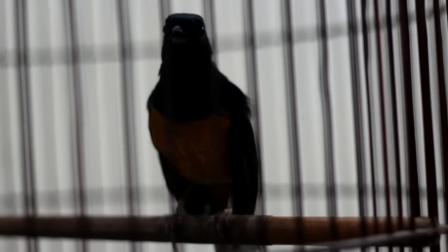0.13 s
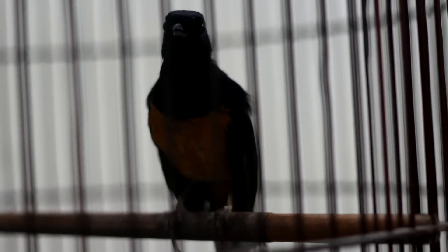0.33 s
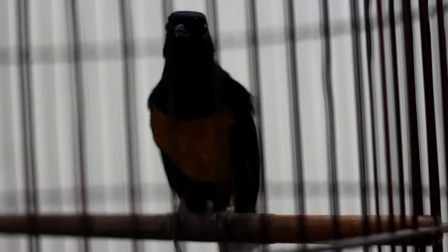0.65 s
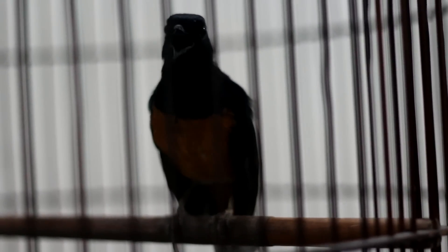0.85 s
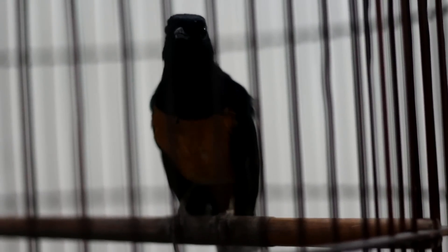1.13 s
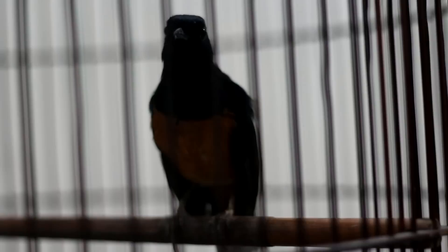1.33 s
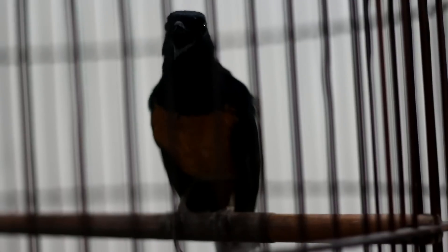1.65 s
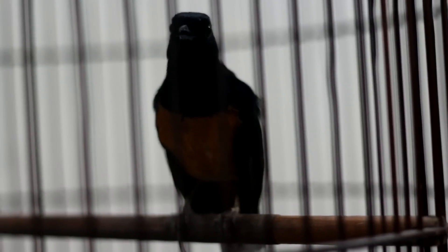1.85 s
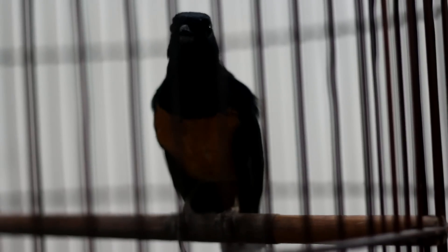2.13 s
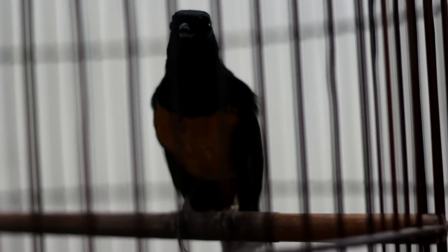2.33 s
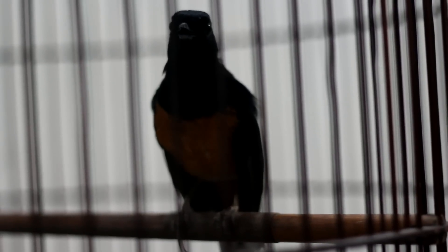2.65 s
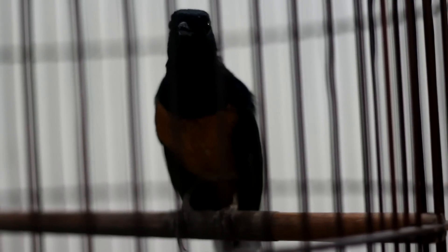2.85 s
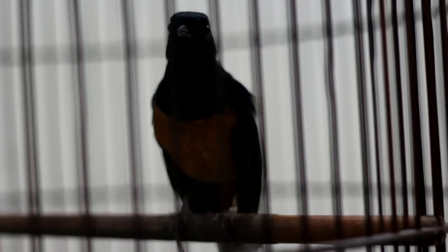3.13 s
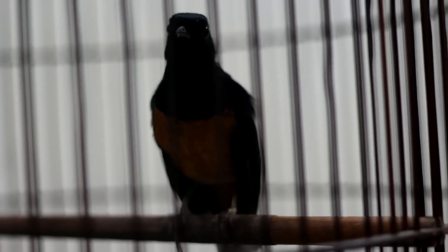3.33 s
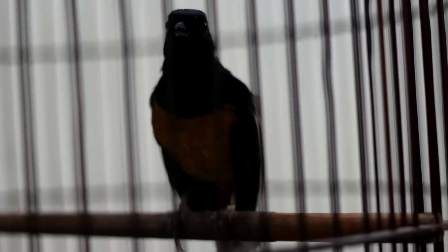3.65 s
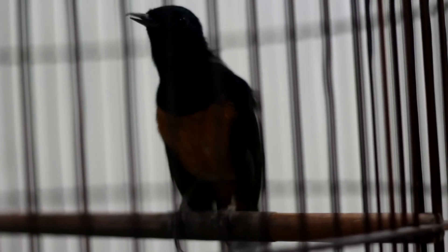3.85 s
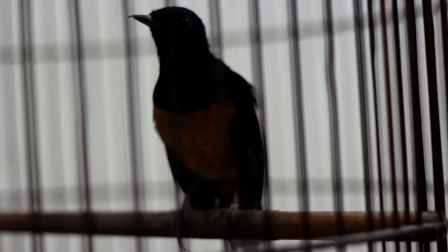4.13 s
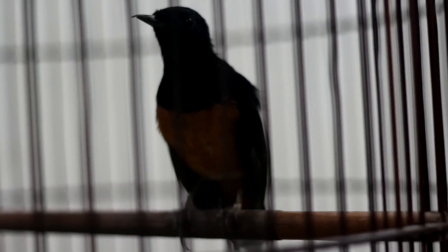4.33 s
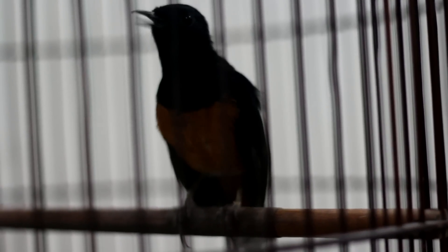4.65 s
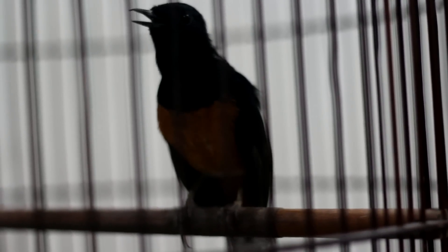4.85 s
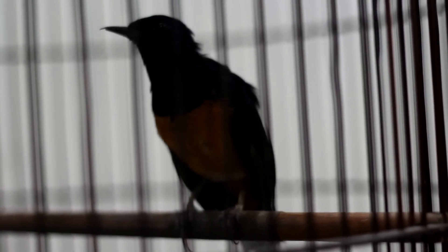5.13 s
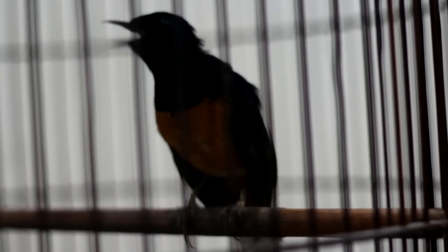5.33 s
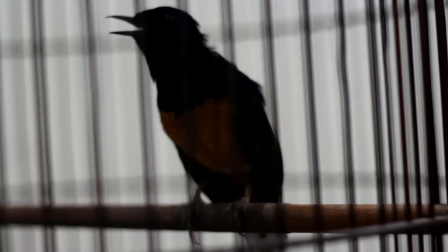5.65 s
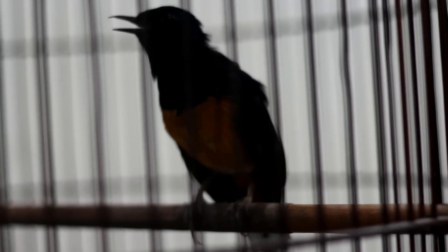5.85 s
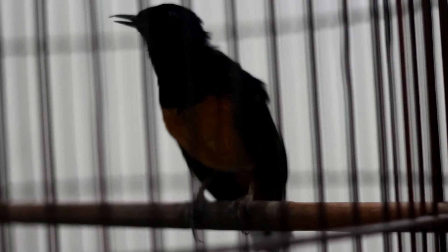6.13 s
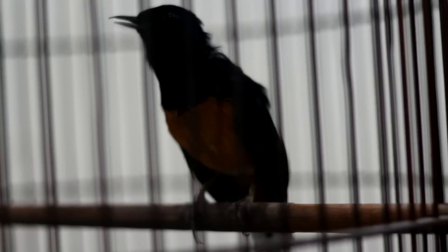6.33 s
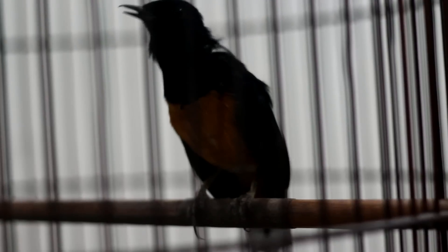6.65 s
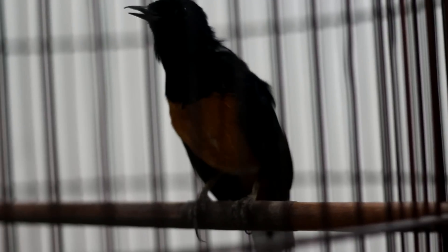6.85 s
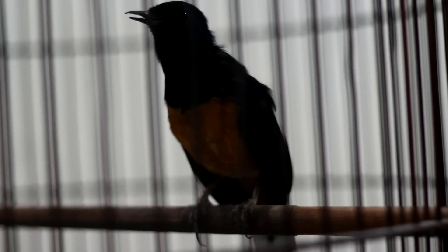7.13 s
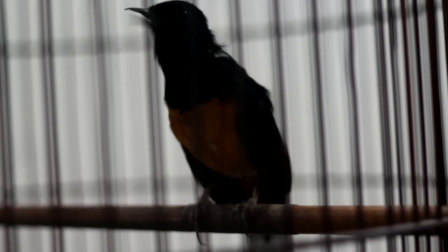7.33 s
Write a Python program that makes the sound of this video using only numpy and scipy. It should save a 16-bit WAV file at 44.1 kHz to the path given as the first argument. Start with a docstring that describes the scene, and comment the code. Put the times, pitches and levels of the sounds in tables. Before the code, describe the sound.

Clear, loud whistles from a nearby songbird ring around a hard-walled room. Warbles and a high rattle lead into a phrase of bending, gliding notes; the middle is sparser, with two short bursts, and the song ends in a busy string of quick downward slides and trills. Raspy chirps and a few faint ticks come from further away, and soft background noise swells a little whenever the singer pauses.

```python
"""Caged songbird in an echoing room

A white-rumped shama whistles loud phrases close to the microphone in a hard-walled room. Its notes are
almost pure tones (trills, a rattle, slurs, glides) that grow louder as more breath pushes them higher.
Harsh chips, probably from another bird, and faint ticks sound further off. An automatic gain control
turns everything down under the song and lets the room noise swell back in the pauses."""
import sys
import numpy as np
from scipy import signal
from scipy.fft import rfft, irfft
from scipy.io import wavfile
from scipy.ndimage import uniform_filter1d, minimum_filter1d

SR = 44100
rng = np.random.default_rng(int(sys.argv[2]) if len(sys.argv) > 2 else 0)


def persist_wave(psi):
    """Save psi, clipped to +-1, as 16-bit WAV."""
    counts = np.round(np.clip(psi, -1, 1) * 32767).astype(np.int16)
    wavfile.write(sys.argv[1], SR, np.atleast_2d(counts).T)


N = 330750
TIME = np.arange(N) / SR
CUTOFF_HZ = 15700


def from_db(db):
    """Turn decibels into a multiplier."""
    return 10 ** (np.asarray(db) / 20)


def unit_level(x):
    """Scale a sound to an average power of 1."""
    return x / np.sqrt(np.mean(x ** 2) + 1e-20)


def at_hz(points, hz):
    """Read between a table's rows, with octaves evenly spaced."""
    table = np.array(points)
    return np.interp(np.log(np.maximum(hz, 1)), np.log(table[:, 0]), table[:, 1])


def smooth(x, seconds):
    """Average each sample with its neighbours."""
    return uniform_filter1d(x, max(1, int(seconds * SR)), mode="nearest")


def wander(rate_hz, count):
    """Random drift, roughly 1 either way."""
    knots = rng.standard_normal(4096)
    return np.interp(TIME[:count] * rate_hz, np.arange(len(knots)), knots)


# the tone of the room noise: frequency_hz, level_db
NOISE_COLOUR = [(25, -29.5), (45, 0), (90, -2), (150, -0.5), (230, -7.5), (560, -2), (1000, -5),
                (2500, -3.5), (4500, -11), (8000, -16), (11000, -22.5), (15000, -36.5)]
# its slow rise and fall: time_s, level_db
NOISE_LEVEL = [(0, -32.5), (1.6, -39), (2.6, -35.5), (3.6, -35), (4.4, -33), (5.4, -34.5), (6, -34.5),
               (7.5, -38.5)]

def room_noise():
    """Dull background noise that slowly fades and swells."""
    colour = from_db(at_hz(NOISE_COLOUR, np.fft.rfftfreq(N, 1 / SR)))
    level = from_db(np.interp(TIME, *np.transpose(NOISE_LEVEL)))
    return level * unit_level(irfft(rfft(rng.standard_normal(N)) * colour, N))


# how well the bird's throat passes overtones: frequency_hz, gain_db
THROAT = [(2500, -7), (3700, -4), (4600, -12), (5500, -7.5), (6400, -21), (7600, -14.5), (9700, -1),
          (11200, -15.5), (12500, -22.5), (14500, -20.5)]

def overtone_db(k, pitch):
    """Level at k times the pitch: the throat shapes low notes; high ones keep mostly k = 2 and 3."""
    beak_open = np.interp(pitch, [2600, 3700], [0, 1])
    shut_db = -28.5 + at_hz(THROAT, k * pitch)
    open_db = -20.5 - 4.5 * (k - 2) ** 2
    return (1 - beak_open) * shut_db + beak_open * open_db


def envelope(t, attack_s=0.021, release_s=0.0075):
    """A note swells in, holds and stops quickly; short notes fade faster."""
    rise = np.minimum(t / min(attack_s, 0.3 * t[-1]), 1)
    fall = np.minimum((t[-1] - t) / min(release_s, 0.25 * t[-1]), 1)
    return rise * np.sin(fall * np.pi / 2) ** 2


JITTER, BUZZ_JITTER, SHIMMER_DB = 0.0061, 0.09, 3   # unsteady pitch (as shares of it) and level
BREATH_DB_PER_OCTAVE = 21.5   # more breath makes a note both higher and louder

def whistle(path, level_db, crescendo_db, bright_db, rate_hz=0, swing_hz=0, buzz=0, bite=0):
    """One note: the bird's voice box follows a pitch path and adds weak overtones."""
    t = TIME[:len(path)]
    rasp = buzz * t / t[-1]
    pitch = smooth(path, 0.0017) + swing_hz * np.sin(2 * np.pi * rate_hz * t)
    pitch *= 1 + JITTER * wander(500, len(t)) + BUZZ_JITTER * rasp * wander(3000, len(t))
    phase = 2 * np.pi * np.cumsum(pitch) / SR
    breath_db = BREATH_DB_PER_OCTAVE * np.log2(path / path.mean())
    note_db = level_db + breath_db + crescendo_db * (t / t[-1] - 0.5)
    # bright_db lifts the overtones; they sink in the soft parts of a note
    bright_db = bright_db + 0.033 * (note_db - note_db.max())
    # bite adds a hard edge one octave up
    tone = np.sin(phase) + bite * from_db(at_hz(THROAT, 2 * pitch)) * np.sin(2 * phase)
    for k in range(2, 10):
        gain = from_db(overtone_db(k, pitch) + bright_db)
        tone += gain * (k * pitch < CUTOFF_HZ) * np.sin(k * phase)
    # a buzz repeats only every second vibration, which adds in-between tones
    tone += rasp * (np.sin(0.5 * phase) + 0.85 * np.sin(1.5 * phase) + 0.38 * np.sin(2.5 * phase))
    loudness = from_db(note_db + SHIMMER_DB * wander(200, len(t)))
    return np.sqrt(2) * tone * loudness * envelope(t)


def progress(length_s):
    """Run from 0 to 1 through a note."""
    return np.linspace(0, 1, int(length_s * SR))


def bowed(length_s, from_hz, to_hz, bow_hz):
    """A straight pitch path with its middle lifted by bow_hz."""
    share = progress(length_s)
    return from_hz + (to_hz - from_hz) * share + bow_hz * (1 - (2 * share - 1) ** 2)


# warbling notes:
# start_s, length_s, from_hz, to_hz, bow_hz, rate_hz, swing_hz, level_db, crescendo_db, bright_db
TRILLS = [ (-.014, 0.17, 1137, 1240, 348.5, 44.86, 64, -8, -2, 2),
          (0.205, 0.13, 2319, 1945, -130, 54.1, 58.2, 0.5, 15.5, -0.5),
          (3.812, 0.099, 1656, 1631, 117, 48.4, 161, 2.5, 6, 1.5),
          (4.869, 0.113, 1711, 1694, 13.5, 42.7, 144.5, -7.5, 8, 9),
          (6.711, 0.1056, 1374, 1367, 14.5, 27.8, 60.2, -3.5, -1.5, -6),
          (6.918, .21, 1495, 1558, 59.5, 42.15, 79, -6.5, 1, 3)]

def trills():
    """The pitch swings quickly up and down as it slides."""
    for start_s, length_s, from_hz, to_hz, bow_hz, rate_hz, swing_hz, *voice in TRILLS:
        yield start_s, whistle(bowed(length_s, from_hz, to_hz, bow_hz), *voice, rate_hz, swing_hz)


# harsh calls further off: start_s, level_db, centre_hz
CHIPS = [(0.283, -29.5, 5440), (0.368, -26, 5140), (.74, -28, 4700), (1.184, -28.5, 4786),
         (2.713, -28, 4200), (3.07, -28, 4300), (3.159, -30.5, 5062), (3.566, -36, 3800),
         (3.679, -33, 4200), (4.3, -17.5, 4850), (4.394, -23, 4240), (6.156, -22, 5090), (6.246, -23, 4520),
         (6.328, -23.5, 4620), (6.538, -27, 5350), (6.624, -28, 4770), (6.723, -25, 4455),
         (6.812, -24, 4160)]

def chips(rise_s=0.011, fade_s=0.017, glide_s=0.022, fall_octaves=0.7, roughness=0.12, hiss_db=-2):
    """Short rasps: a very rough tone slides down inside a band of hiss."""
    out, t = np.zeros(N), TIME[:SR // 8]
    swell = np.minimum(t / rise_s, 1) * np.exp(-np.maximum(t - 2 * rise_s, 0) / fade_s)
    slide = fall_octaves * (np.exp(-t / glide_s) - 0.5)
    throat = signal.butter(2, [3300, 7200], "band", fs=SR, output="sos")
    for start_s, level_db, centre_hz in CHIPS:
        pitch = centre_hz * 2 ** (slide + roughness * wander(1526, len(t)))
        tone = unit_level(wander(550, len(t)) * np.sin(2 * np.pi * np.cumsum(pitch) / SR))
        hiss = unit_level(signal.sosfilt(throat, rng.standard_normal(len(t))))
        at = int(start_s * SR)
        out[at:at + len(t)] += from_db(level_db) * swell * (tone + from_db(hiss_db) * hiss)
    # the chips carry little treble above about 9.5 kHz
    return signal.sosfilt(signal.butter(4, 9500, fs=SR, output="sos"), out)


# faint ticks: start_s, level_db
TICKS = [(0.492, -34.5), (0.536, -35.5), (3.359, -36), (4.562, -34)]

def ticks(fade_s=0.004):
    """Tiny bursts of noise, like claws or seed husks on a cage."""
    bursts = sum(from_db(db) * (TIME > s) * np.exp(-np.abs(TIME - s) / fade_s) for s, db in TICKS)
    band = signal.butter(2, [4000, 11000], "band", fs=SR, output="sos")
    return bursts * unit_level(signal.sosfilt(band, rng.standard_normal(N)))


# the rattle's buzzes: start_s, length_s, from_hz, rate_hz, level_db, bright_db
RATTLE = [(.783, 0.049, 3390, 96, 2, -1), (0.857, 0.055, 3995, 131.4, 2, 0.5),
          (0.933, 0.045, 3864, 140.4, 0, 3.5), (1.015, .045, 3933, 136.2, 3.5, 0.5)]

def rattle():
    """A run of rising notes that warble fast enough to buzz."""
    for start_s, length_s, from_hz, rate_hz, level_db, bright_db in RATTLE:
        path = bowed(length_s, from_hz, to_hz=4500, bow_hz=122.3)
        yield start_s, whistle(path, level_db, crescendo_db=-5.5, bright_db=bright_db,
                               rate_hz=rate_hz, swing_hz=320, buzz=0.26)


# five pitch paths: time_s, pitch_hz
UPSWEEP = [(1.684, 3700), (1.694, 3590), (1.722, 3806), (1.778, 4560), (1.808, 4803), (1.848, 4634)]
DOWNSWEEP = [(2.222, 3630), (2.266, 3520), (2.276, 3315), (2.296, 2240), (2.302, 2160)]
SWING = [(2.709, 1862), (2.763, 2073), (2.813, 2029), (2.855, 1897), (2.897, 1477), (2.937, 1447),
         (2.985, 1910), (3.027, 2027), (3.072, 1943)]
OVERSHOOT = [(5.382, 3720), (5.397, 3615), (5.442, 4024), (5.462, 4520), (5.47, 5324), (5.48, 5030),
             (5.498, 4930), (5.53, 4860)]
SAG = [(5.92, 2370), (5.958, 2469), (6.008, 2350), (6.054, 2079), (6.118, 2117)]
# how each is sung: path, level_db, crescendo_db, bright_db
SLURS = [(UPSWEEP, 1, 1.6, 2.7), (DOWNSWEEP, -2, -1.4, 3.5), (SWING, -2, -12, -2), (OVERSHOOT, 3.8, 3, -2),
         (SAG, 2.4, 6.7, -4)]

def slurs():
    """One unbroken whistle bends through several pitches."""
    for points, *voice in SLURS:
        time_s, pitch_hz = np.transpose(points)
        path = np.interp(np.arange(time_s[0], time_s[-1], 1 / SR), time_s, pitch_hz)
        yield time_s[0], whistle(path, *voice)


# a scoop's outline: share_of_length, share_of_top_pitch
SCOOP_SHAPE = [(0, .77), (.16, .775), (.25, .85), (.56, .82), (.71, .675), (.8, .92), (.89, 0.96), (1, 1)]
# scooped notes: start_s, length_s, top_hz, level_db, crescendo_db, bright_db
SCOOPS = [(1.952, .162, 3096, -0.5, -3, -4), (5.633, .186, 3150, 5, -0.5, -3.5)]

def scoops():
    """The whistle steps up, sags into a dip and leaps to its top."""
    for start_s, length_s, top_hz, *voice in SCOOPS:
        path = top_hz * np.interp(progress(length_s), *np.transpose(SCOOP_SHAPE))
        yield start_s, whistle(path, *voice)


# sliding notes: start_s, length_s, from_hz, to_hz, bow_hz, level_db, crescendo_db, bright_db
GLIDES = [ (2.113, 0.013, 3320, 3240, 40, 0.5, -6, -8.5), (2.306, .035, 2395, 2540, 219.5, 7.5, 0, 9),
          (2.426, 0.12, 1882, 2012, -39, 0.5, 6, -3), (2.544, 0.061, 2083, 2294, 96, 5.5, 3.5, 0),
          (6.11, 0.044, 2133, 1167, -2, -9, 13.5, 7.5), (6.245, 0.036, 1972, 1146, 84.5, -1.5, 9.5, -2),
          (6.308, .037, 2443, 1170, -46, -3.5, 2.5, 7), (6.365, 0.043, 2490, 1178, -2, -1.5, -8, 6.5),
          (6.434, .029, 2643, 1200, -110, -2.5, -5.5, 10), (6.557, 0.0453, 864, 1016, 8, -23.5, 3, 14),
          (6.617, .046, 1780, 1194, 181.5, -2.5, -15, 3.5), (6.677, 0.044, 962, 1470, 1, -11.5, 6, -5),
          (7.238, 0.061, 1294, 805, 13.5, -19.5, 5, -1), (7.341, .052, 1632, 853, 20, -9, -7, 0.5),
          (7.394, 0.069, 907, 2013, 368, -7.5, -3, 4.5)]

def glides():
    """The whistle slides along one smooth curve."""
    for start_s, length_s, from_hz, to_hz, bow_hz, *voice in GLIDES:
        yield start_s, whistle(bowed(length_s, from_hz, to_hz, bow_hz), *voice)


# notes before the flicks: start_s, length_s, from_hz, to_hz, bow_hz, level_db, crescendo_db, bright_db
PIPS = [(3.627, 0.047, 1762, 1630, 200, -7.5, 0.5, 2.5), (4.682, 0.0494, 1827, 2038, 31, -5, 5, 1.4)]

def pips():
    """Short, pressed glides with a hard edge."""
    for start_s, length_s, from_hz, to_hz, bow_hz, *voice in PIPS:
        yield start_s, whistle(bowed(length_s, from_hz, to_hz, bow_hz), *voice, bite=from_db(-19))


# a flick's outline: share_of_length, share_of_top_pitch
FLICK_SHAPE = [(0, .69), (.33, .78), (.54, .85), (.68, .75), (.82, 1), (1, .78)]
# flicked notes: start_s, length_s, top_hz, level_db, crescendo_db, bright_db
FLICKS = [(3.735, 0.046, 2169, -7, 13.5, 6), (4.794, .057, 2377, -5.5, 3, 6)]

def flicks():
    """A hard-edged whistle climbs, catches, snaps upward and drops."""
    for start_s, length_s, top_hz, *voice in FLICKS:
        path = top_hz * np.interp(progress(length_s), *np.transpose(FLICK_SHAPE))
        yield start_s, whistle(path, *voice, bite=from_db(-16.5))


def shama(beak_cut_hz=11800):
    """The whole song; its highest treble is beamed past the microphone."""
    out = np.zeros(N + 2 * SR)   # a spare second at each end
    for notes in trills(), rattle(), slurs(), scoops(), glides(), pips(), flicks():
        for start_s, sound in notes:
            at = SR + int(start_s * SR)
            out[at:at + len(sound)] += sound
    return signal.sosfilt(signal.butter(4, beak_cut_hz, fs=SR, output="sos"), out[SR:SR + N])


# bounces off the cage floor and near walls: delay_s, level_db
ECHOES = [(.0043, -30), (.0087, -14), (0.0135, -16.5), (0.0225, -16)]

def near_echoes(x):
    """Delayed copies clash with a sliding note and make it flutter."""
    return sum(from_db(db) * np.pad(x, (int(delay_s * SR), 0))[:N] for delay_s, db in ECHOES)


# how long the room takes to fade by 60 dB: frequency_hz, ring_s
ROOM_RING = [(1000, 0.87), (2000, 1), (4500, 0.89), (8000, 0.64), (14000, 0.29)]

def room(x, build_s=0.012, early_db=14, early_s=0.011):
    """Many echoes blur into a tail that starts strong and dies fastest in the treble."""
    t = TIME[:int(1.3 * SR)]
    noise, hz = rfft(rng.standard_normal(len(t))), np.fft.rfftfreq(len(t), 1 / SR)
    tail = np.zeros(len(t))
    for band_hz, ring_s in ROOM_RING:
        band = at_hz([(f, float(f == band_hz)) for f, _ in ROOM_RING], hz)
        tail += irfft(noise * band, len(t)) * from_db(-60 * t / ring_s)
    tail *= np.minimum(t / build_s, 1) * from_db(early_db * np.exp(-t / early_s))
    return signal.fftconvolve(x, tail)[:N] / np.sqrt(np.sum(tail ** 2))


def scene():
    """The near singer is heard mostly directly; the far sounds carry more of the room."""
    song, far = shama(), chips() + ticks()
    ring = room(from_db(-8.5) * song + from_db(1) * far)
    return (song + near_echoes(song) + from_db(5) * far + ring + room_noise())[None]


def gain_control(x, threshold_db=-8.5, release_db_per_s=19, attack_s=0.017, start_cut_db=14):
    """The volume starts turned down, drops on loud sounds and climbs back steadily."""
    level_db = 10 * np.log10(np.maximum(smooth(x ** 2, 0.0033), 1e-12))
    over_db = np.maximum(level_db - threshold_db, 0)
    climb_db = release_db_per_s * TIME
    held_db = np.maximum.accumulate(np.maximum(over_db + climb_db, start_cut_db)) - climb_db
    lag = np.exp(-1 / (attack_s * SR))
    cut_db, _ = signal.lfilter([1 - lag], [1, -lag], held_db, zi=[lag * start_cut_db])
    return x * from_db(-cut_db)


def limiter(x, ceiling=0.88, look_s=0.0063):
    """Look ahead and dip the volume around each peak."""
    allowed = np.minimum(1, ceiling / np.maximum(np.abs(x), 1e-9))
    return x * smooth(minimum_filter1d(allowed, int(2 * look_s * SR) + 1), look_s)


def record(dry):
    """Even out the volume, catch the peaks and cut the highest treble."""
    limited = limiter(gain_control(dry[0]))
    treble_cut = signal.cheby2(14, 70, CUTOFF_HZ + 500, fs=SR, output="sos")
    return signal.sosfilt(treble_cut, limited)[None]


dry = scene()
out = record(dry)
persist_wave(out)
```